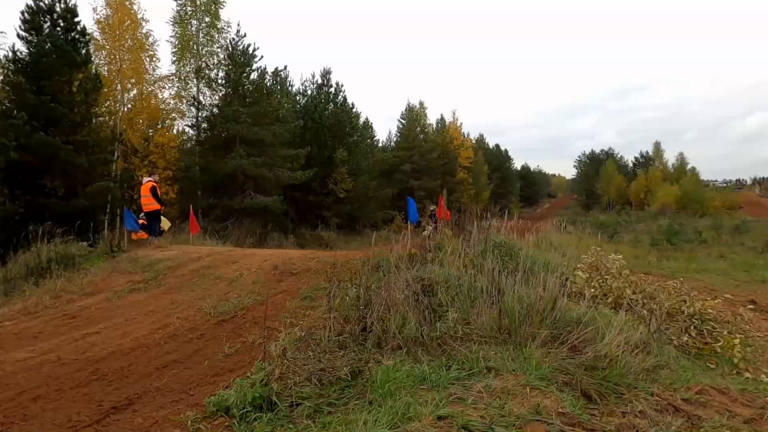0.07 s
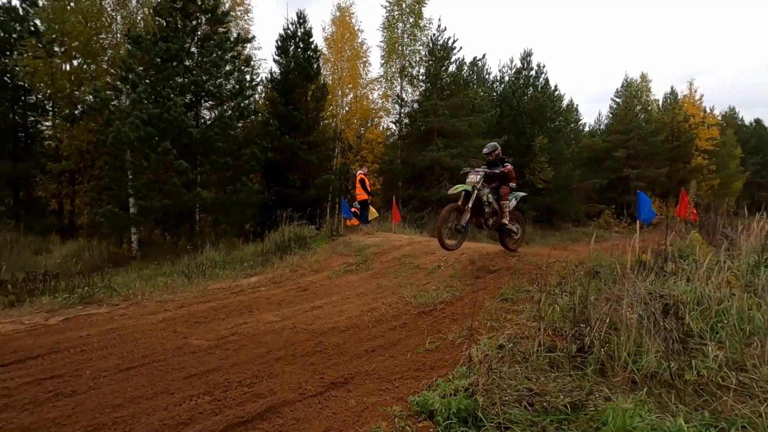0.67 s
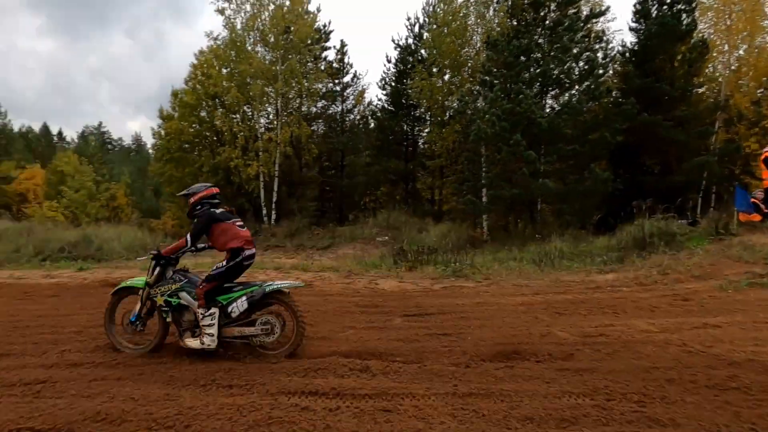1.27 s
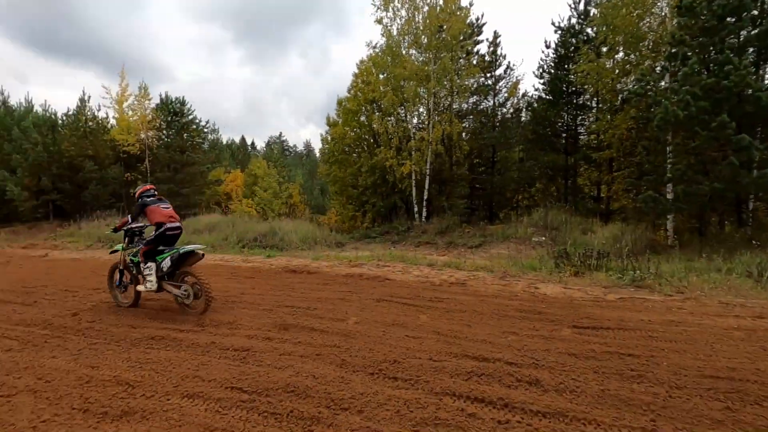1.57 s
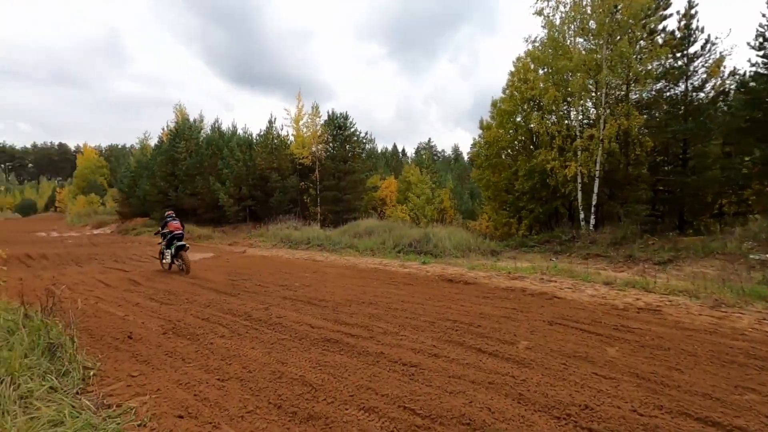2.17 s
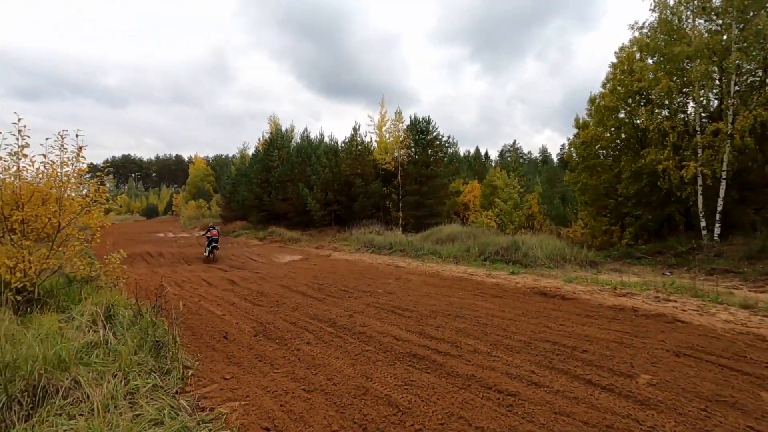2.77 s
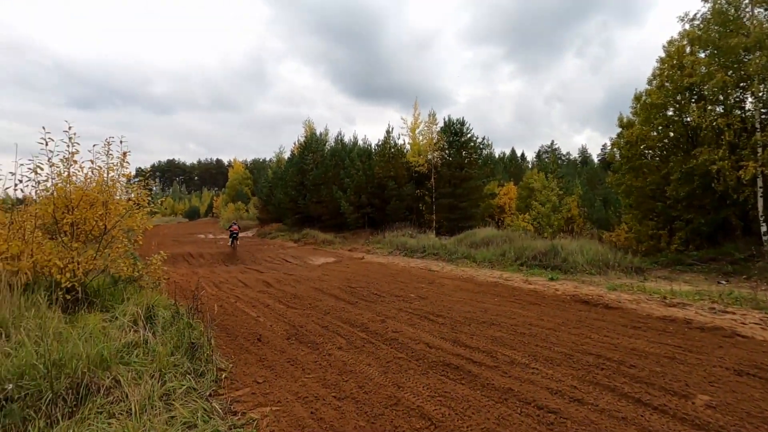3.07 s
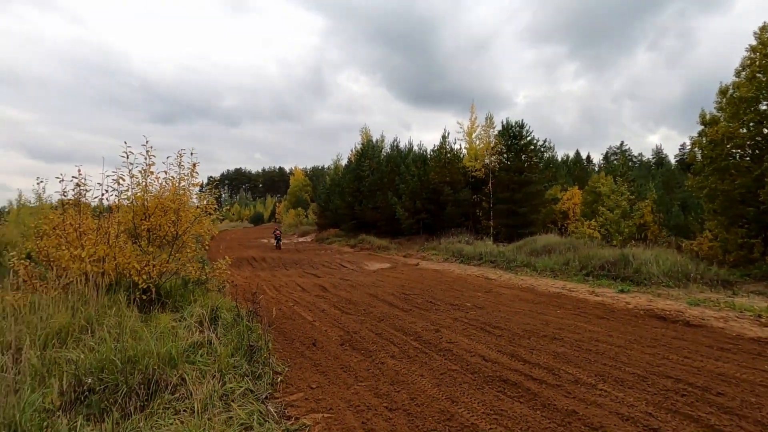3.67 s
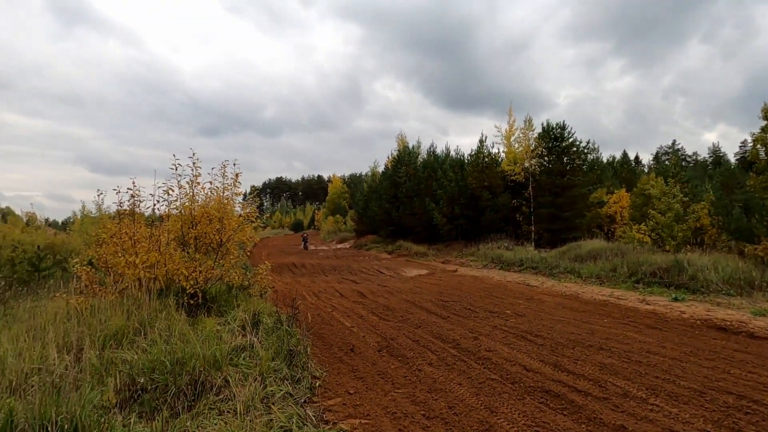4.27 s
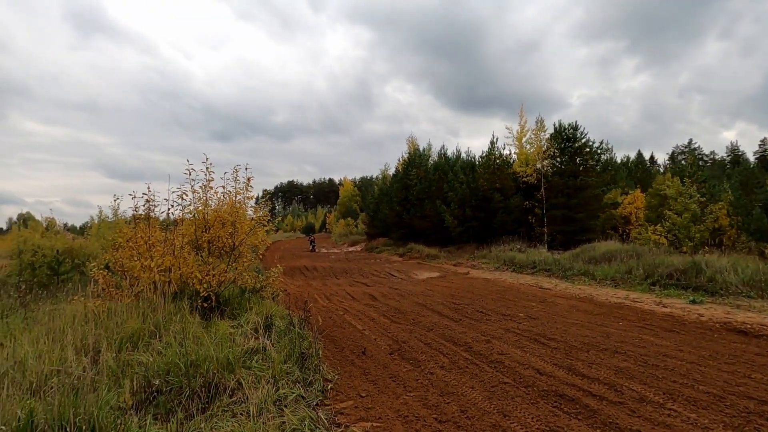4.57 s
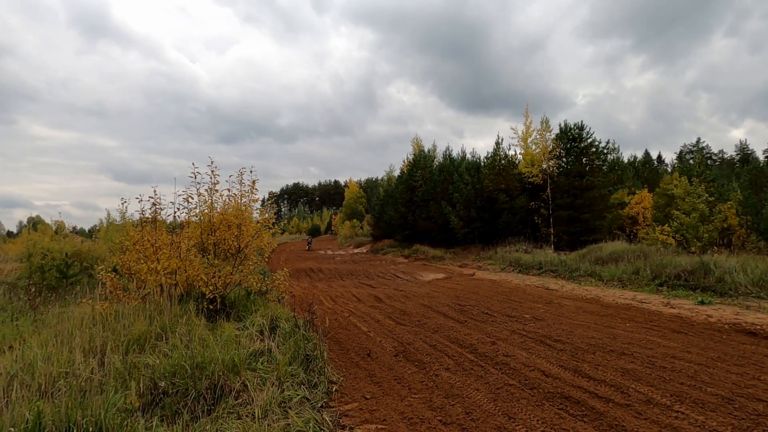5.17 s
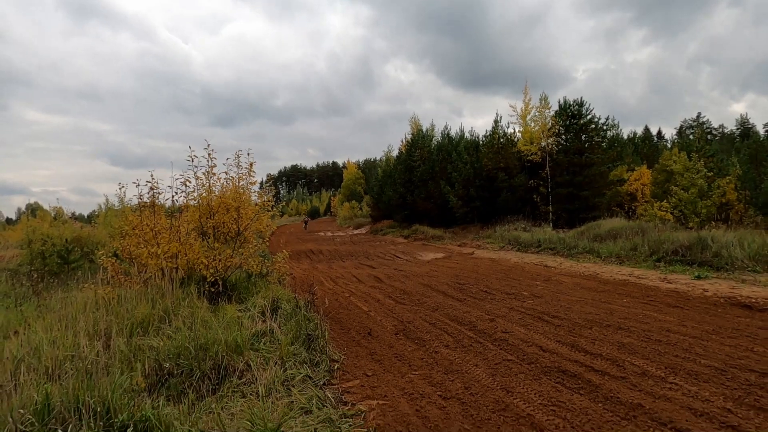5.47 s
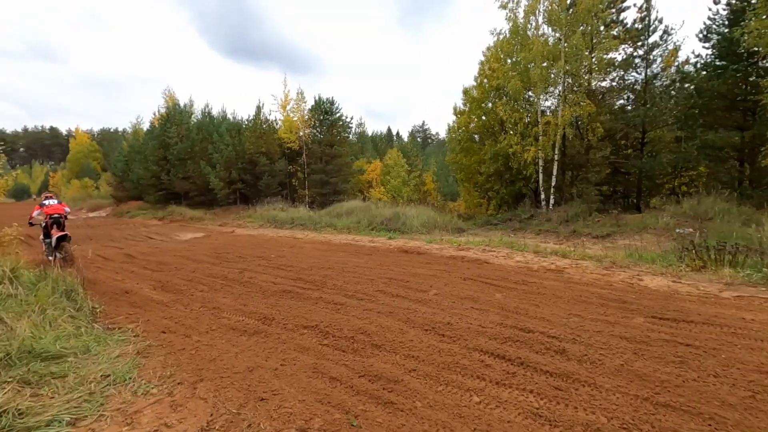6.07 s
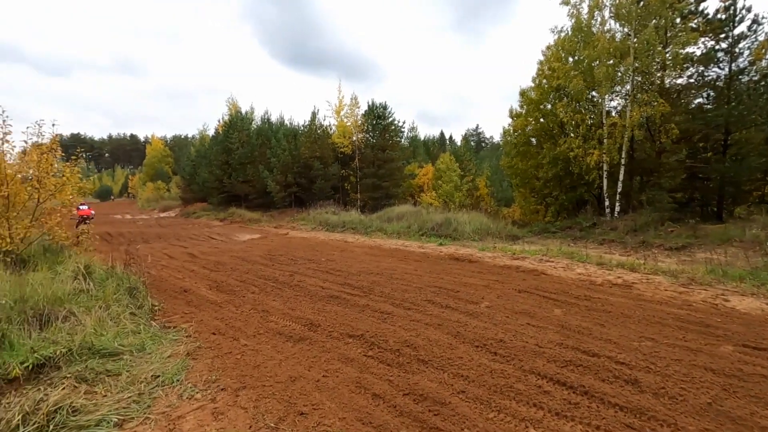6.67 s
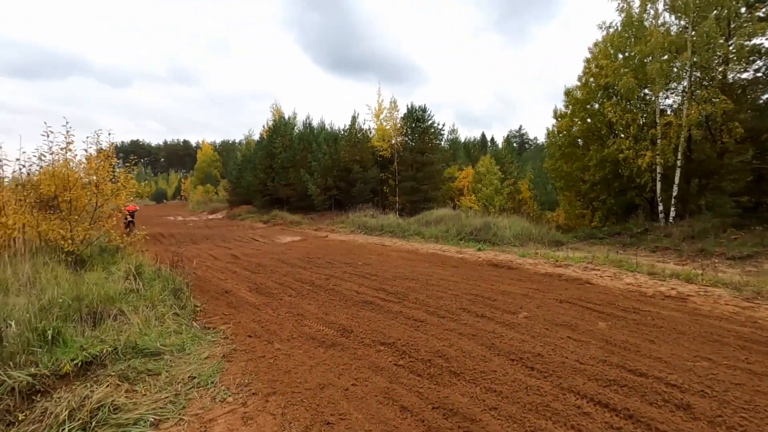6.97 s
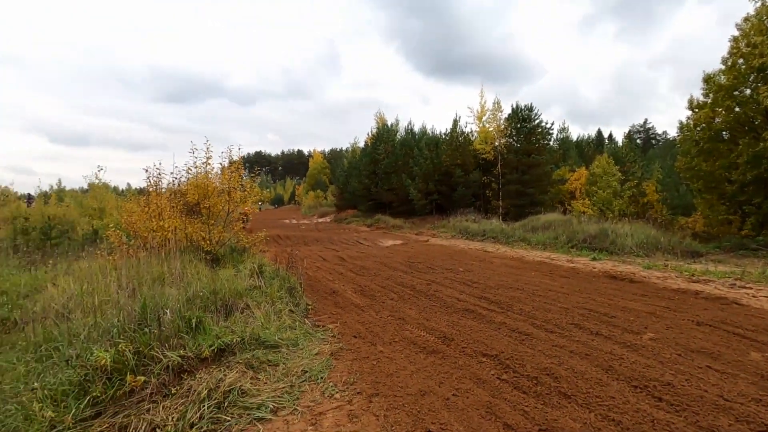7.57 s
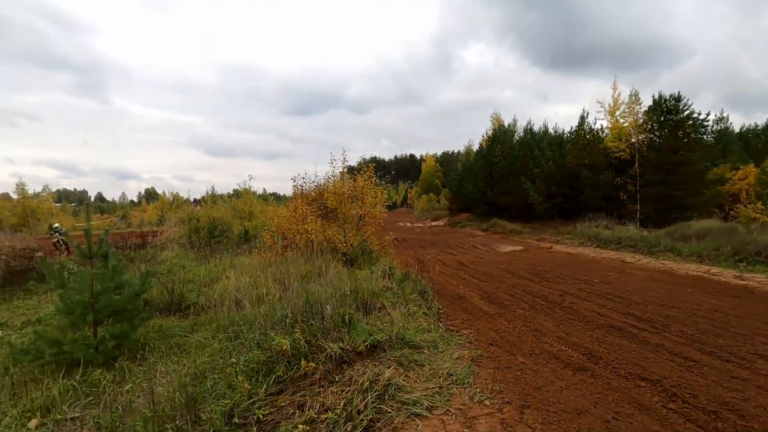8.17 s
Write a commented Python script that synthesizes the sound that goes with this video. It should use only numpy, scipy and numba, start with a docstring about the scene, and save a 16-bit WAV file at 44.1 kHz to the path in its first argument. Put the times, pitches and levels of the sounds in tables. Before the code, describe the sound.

A four-stroke motocross bike barks for an instant outdoors and cuts to silence at 0.1 seconds. At 0.4 the sound returns, the bike approaching and revving higher, its exhaust thumping and its engine clattering up close, with a second engine beating against it. It lands a jump with a sharp knock at 1.2 seconds; three exhaust pops and two tiny sprays of sand follow by 1.7. The bike rides off to the left in repeated rasping throttle bursts, most distant around 4.4 seconds. Another bike grows louder until the sound stops dead at 5.9. At 6.2 the engines fade quickly back in, barking and rasping further left and gradually receding, with a distant throttle snap near 7.8, until the end at about 8.3. Chains, tyres and soil hiss faintly under the engines, and low wind rumbles on the microphone, weaker in the last stretch.

```python
"""A four-stroke motocross bike barks across a dirt track; after a hard cut one comes close, jumps,
lands and rides off, and after another cut more follow. Each firing thumps the exhaust pipe and cracks
out a puff of gas; under load the tailpipe rasps, and close by the casing clatters. A second bike beats
against the nearest. Chains, tyres and thrown soil hiss, and a little wind rumbles on the microphone."""
import sys
import numpy as np
from scipy import signal
from scipy.fft import rfft, irfft
from scipy.io import wavfile
from scipy.ndimage import uniform_filter1d
from numba import njit

SR = 44100
rng = np.random.default_rng(int(sys.argv[2]) if len(sys.argv) > 2 else 0)


def persist_wave(psi):
    """Save psi, clipped to +-1, as 16-bit WAV."""
    counts = np.round(np.clip(psi, -1, 1) * 32767).astype(np.int16)
    wavfile.write(sys.argv[1], SR, np.atleast_2d(counts).T)


N = 366471
T = np.arange(N) / SR
TICKS = T[::100]  # slow clock of the controls
NEAR_M = 10  # distance from the microphone at which levels are set

# lead bike's throttle twists (opens [s], shuts [s], firing rate reached [Hz], honk swell if above 0 [dB])
LEAD_THROTTLE = [(-.14, 0.149, 72, 5), (0.159, 0.404, 64.5, 20.5), (0.402, 0.703, 63.6, 6.5),
                 (.705, .81, 68.5, 6), (0.799, 1.001, 86.83, 9.5), (1, 1.09, 87.64, 7),
                 (1.088, 1.205, 81.48, 11), (1.31, 1.389, 50.9, -2.5), (1.389, 1.582, 49.77, 1),
                 (1.6, 2.091, 63.32, 4.5), (2.159, 2.3, 64.63, 8), (2.335, 2.667, 68.38, 7.5),
                 (2.777, 3.045, 62.34, 4), (3.22, 3.527, 62, 4.5), (3.562, 3.797, 58.2, 3.5),
                 (3.876, 4.255, 63.04, 4), (4.426, 4.64, 66.28, 3), (4.691, 4.862, 63.93, 2.5),
                 (4.901, 5.386, 54.4, 0.5), (5.437, 5.624, 71.55, 0), (5.709, 5.911, 80.27, -2),
                 (6.121, 6.385, 38.46, 5.5), (6.392, 6.502, 64.44, 8), (6.532, 6.701, 78.22, 3.5),
                 (6.778, 6.857, 63, 10.5), (6.859, 7.254, 75.88, -2), (7.335, 7.439, 62.6, 3.5),
                 (7.438, 7.677, 84.36, -3.5), (7.796, 7.99, 68.07, 6.5), (8.01, 8.139, 69.7, 9.5),
                 (8.134, 8.312, 85.44, 4.5)]
# second bike's throttle twists (opens [s], shuts [s], firing rate reached [Hz], strength of firings [dB])
SECOND_THROTTLE = [(.135, 0.735, 60, -6.5), (.744, 1.333, 78, -6.5), (3.02, 3.5, 85.95, -4.5),
                   (3.541, 4.161, 87.97, -10.5), (4.335, 4.831, 44.99, -1.5), (4.9, 5.144, 66.12, 0),
                   (5.179, 5.796, 54.2, -9.5), (6.101, 6.451, 62.32, -11), (6.715, 7.003, 44.65, -2.5)]
# low resonance of the exhaust pipe (frequency [Hz], gain [dB])
PIPE_COLOUR = [(25, -51), (45, -6), (62, -8.5), (85, 5.5), (120, 9.5), (185, 6), (240, -7), (310, -11),
               (420, -49.5), (800, -116.5)]
# hiss of chains, tyres and soil (frequency [Hz], gain [dB])
HISS_COLOUR = [(1500, -6), (3000, -4.5), (4200, 5), (8200, -1.5), (9500, -15), (12000, -25.5),
               (14000, -45.5)]


def undb(db):
    """Decibels to gain."""
    return 10 ** (np.asarray(db) / 20)


def curves(rows):
    """One value a sample for each column after a table's time column."""
    s, *columns = np.transpose(rows)
    return [np.interp(T, s, column) for column in columns]


def unit(x):
    """Scale to rms 1."""
    return x / np.sqrt(np.mean(x ** 2))


def even(x, size=3300):
    """Hold the running rms at 1 and leave the single firings intact."""
    power = uniform_filter1d(uniform_filter1d(np.atleast_2d(x ** 2).mean(0), size), size)
    return x / np.sqrt(np.abs(power) + 1e-12)


def colour(x, points, size=8192):
    """Ring a minimum-phase body whose response follows (frequency [Hz], gain [dB]) points."""
    hz, db = np.transpose(points)
    gain_db = np.interp(np.log(np.arange(size // 2 + 1) * SR / size + 1), np.log(hz), db)
    cepstrum = irfft(np.log(undb(gain_db)))[:size // 2]
    cepstrum[0] /= 2
    response = irfft(np.exp(rfft(2 * cepstrum, size)))[:size // 2]
    return signal.oaconvolve(np.atleast_2d(x), response[None], axes=1)[:, :N]


@njit
def resonance(x, hz, width):
    """State-variable band-pass whose centre and width move, gain 1 at the centre."""
    y, band, low = np.empty(len(x)), 0., 0.
    for i in range(len(x)):
        g, damping = np.tan(np.pi * hz[i] / SR), width[i] / hz[i]
        v = (band + g * (x[i] - low)) / (1 + g * (g + damping))
        band, low, y[i] = 2 * v - band, low + 2 * g * v, damping * v
    return y


def two_chambers(x, hz, width):
    """Two equal resonances in a row: a narrower peak with steep skirts."""
    return resonance(resonance(x, hz, width), hz, width)


def air(apart, size=N):
    """Turbulence at the two sides of the microphone: a shared part and a part that differs."""
    noise = rng.standard_normal((3, size))
    return unit(noise[0] + apart * noise[1:])


def place(x, pan_db, lag_ms):
    """A source off to one side reaches left and right at different levels and times."""
    left = np.interp(T - lag_ms / 1000, T, x[0])
    return np.array([left * undb(pan_db / 2), x[1] * undb(-pan_db / 2)])


def throttle(twists, release_s, scale=float, attack_s=0.048):
    """Each twist attacks, holds its scaled level and releases; the strongest one counts."""
    envelopes = []
    for opens, shuts, _, db in twists:
        attack = np.clip((TICKS - opens) / attack_s, 0, 1)
        release = np.exp(-np.maximum(TICKS - shuts, 0) / release_s)
        envelopes.append(scale(db) * attack * release)
    return np.interp(T, TICKS, np.max(envelopes, axis=0))


def revs(twists, idle_hz=38.3, up_s=.205, down_s=.2):
    """Firing rate: it climbs while the throttle is open and sags towards idle once it shuts."""
    hz = np.full(len(TICKS), idle_hz)
    for opens, shuts, top_hz, _ in twists:
        coasting = top_hz < idle_hz + 2
        start_hz = idle_hz if coasting else np.interp(opens, TICKS, hz)
        held_s = np.clip(TICKS - opens, 0, shuts - opens)
        climb = np.expm1(-held_s / up_s) / np.expm1((opens - shuts) / up_s)
        driven_hz = start_hz + (top_hz - start_hz) * climb
        sag = np.exp(-np.maximum(TICKS - shuts, 0) / down_s)
        hz = np.where(TICKS < opens, hz, idle_hz + (driven_hz - idle_hz) * sag)
    return np.interp(T, TICKS, hz)


def firings(hz, jitter_s, scatter_db):
    """One pulse per engine cycle, each a little off in time and strength."""
    # first firing of each of the three stretches (time [s])
    first_firings = [0.0086, .39, 6.21]
    cycles = np.cumsum(hz) / SR
    marks = np.interp([*first_firings, T[-1]], T, cycles)
    firing_cycles = np.concatenate([np.arange(a, b) for a, b in zip(marks, marks[1:])])
    times = np.interp(firing_cycles, cycles, T)
    late, strong = rng.standard_normal((N // 300, 2))[:len(times)].T
    samples = np.clip((times + jitter_s * late) * SR, 0, N - 1).astype(int)
    return np.bincount(samples, undb(scatter_db * strong), N)


def doublings(metres):
    """How often the distance to the microphone has doubled beyond NEAR_M."""
    return np.log2(np.maximum(metres, 1) / NEAR_M)


def exhaust(pulses, metres, facing, swell_db):
    """Firings thump the pipe and, above it, ring the moving honk of intake and silencer."""
    # resonance of intake and silencer, moving with the heading (time [s], centre [Hz], width [Hz])
    honk_path = [(.1, 306, 115.7), (.45, 520, 327), (.75, 330, 202), (.87, 565, 88.7), (1.05, 516, 110),
                 (1.17, 437, 60), (1.35, 606, 466), (1.8, 357, 91.3), (2.6, 371, 64), (4.4, 354, 64.3),
                 (5.5, 338.2, 190), (6.5, 274.4, 74.6), (6.85, 270, 129.9), (7.1, 395, 171.4),
                 (7.38, 429.3, 193.1), (7.7, 310, 105.5), (8.07, 312.4, 65.17), (8.3, 383, 89.5)]
    # body of the silencer (frequency [Hz], gain [dB])
    silencer = [(150, -33.5), (250, 7.5), (340, 6), (600, 1.5), (750, -7), (1100, 2), (2600, -57.5)]
    hz, width = curves(honk_path)
    thump = -even(colour(pulses, PIPE_COLOUR))  # the pipe swings against the shock front
    ring = two_chambers(pulses, hz, 1.5 * width)  # each chamber is wider than the pair
    leak = -undb(-28) * pulses  # a little gets past the chambers, in step with their skirts
    honk = even(colour(ring + leak, silencer))
    thump_db = -17.5 - 2.13 * doublings(metres) + 4.5 * facing + 0.11 * swell_db
    honk_db = -30 - 2.16 * doublings(metres) + swell_db
    return np.repeat(undb(thump_db) * thump + undb(honk_db) * honk, 2, axis=0)


def puffs(pulses, rise_s, decay_s):
    """The gas flow that follows each pulse."""
    t = T[:SR // 20]
    puff = (1 - np.exp(-t / rise_s)) * np.exp(-t / decay_s)
    return unit(np.abs(signal.oaconvolve(pulses, puff)[:N]))


def flares():
    """Smooth swells and lulls of the bark, in dB."""
    # bell-shaped changes of level (time [s], half-length [s], height [dB])
    swells = [(0.065, 0.16, 5), (0.565, 0.17, 4.5), (1.003, 0.28, -0.5), (1.24, 0.041, -15.5),
              (1.355, 0.12, 4.5), (2.305, 0.37, -2.5), (3.5, 0.5, 4), (5.493, 0.36, -3), (6.659, 0.19, -2),
              (7.143, 0.18, -4.5), (7.404, 0.08, -2), (8.13, 0.11, -6)]
    s, half_s, db = np.transpose(swells)
    return np.interp(T, TICKS, np.exp(-((TICKS[:, None] - s) / half_s) ** 2) @ db)


def bark_and_hiss(pulses, metres, facing, swell_db, far_m=31):
    """Each firing's shock front and puff of gas ring the tailpipe; chain and soil hiss above it."""
    # tailpipe close to the microphone (frequency [Hz], gain [dB])
    near_colour = [(300, -5.5), (820, -1), (1050, 2), (1500, -1.5), (1900, -7), (3000, -10), (4200, -15.5),
                   (6000, -19.5), (10000, -62.5)]
    # tailpipe from far down the track (frequency [Hz], gain [dB])
    far_colour = [(350, -13.5), (820, -10), (970, -2.5), (1900, -0.5), (2450, -7), (3000, -9.5),
                  (4200, -13.5), (6000, -30), (10000, -58.5)]
    flare_db = flares()
    sharp_db = -12.5 + 21.5 * facing + 0.51 * flare_db  # on the pipe's axis, cracks top the smeared roar
    far = np.clip(metres / far_m * (0.18 + facing), 0, 1)
    flow = puffs(pulses, rise_s=0.00081, decay_s=0.0016)
    crack = flow * air(apart=0.55) + undb(sharp_db - 9.5) * unit(pulses)
    gas = undb(sharp_db) * even(crack) + air(apart=0.65)
    bark = (1 - far) * even(colour(gas, near_colour)) + far * even(colour(gas, far_colour))
    jet = even(flow) * air(apart=0.94)
    hiss = colour(undb(sharp_db - 6.5) * jet + air(apart=1.0), HISS_COLOUR)
    bark_db = -31 - 6.5 * doublings(metres) + 6.5 * facing + 0.44 * swell_db + flare_db
    hiss_db = -39 - 8.5 * doublings(metres)
    return undb(bark_db) * even(bark), undb(hiss_db) * even(hiss)


def rasp(pulses, starts, ends, from_hz, to_hz, width_hz, db, rise_s=.025, fall_s=0.0073, puff_s=0.0022):
    """Shock fronts and a little turbulence ring the tailpipe at a gliding resonance and its octave."""
    span = (T > starts - rise_s) & (T < ends + 5 * fall_s)
    t, fronts = T[span], pulses[span]
    puff = signal.lfilter([1], [1, -np.exp(-1 / (SR * puff_s))], fronts)
    drive = unit(fronts) + undb(-15) * unit(puff * rng.standard_normal(len(t)))
    hz = np.interp(t, [starts, ends], [from_hz, to_hz])
    width = np.full(len(t), float(width_hz))
    first, octave = (two_chambers(drive, k * hz, k * width) for k in (1, 2))
    envelope = np.clip((t - starts) / rise_s + .5, 0, 1) * np.exp(-np.maximum(t - ends, 0) / fall_s)
    out = np.zeros(N)
    out[span] = unit(first + undb(-19) * octave) * envelope
    return undb(db) * out


def load_rasps(pulses):
    """Under load the lead bike's firings make its tailpipe rasp."""
    # spells of load (start [s], end [s], resonance from [Hz], to [Hz], chamber width [Hz], level [dB])
    spells = [(0.005, .13, 1250, 1460, 900, -27.5), (1.799, 2.685, 1047, 1190, 418, -37.5),
              (3.186, 3.4, 3033, 2833, 800, -43.5), (3.401, 3.75, 1300, 1090, 750, -43),
              (3.949, 4.703, 1241, 1053, 750, -42), (5.421, 5.801, 1722, 1708, 550, -38.5),
              (6.492, 7.085, 3040, 3516, 900, -41), (6.875, 7.086, 1830, 1640, 330, -35.5),
              (7.088, 7.271, 1640, 1953, 750, -34.5), (7.294, 7.47, 1960, 1957, 750, -34.5),
              (7.493, 7.74, 1880, 1680, 600, -39), (8.007, 8.33, 1786, 1687, 700, -35)]
    return sum(rasp(pulses, *spell) for spell in spells)


def clatter(hz, metres, facing, decay_cycles=0.93, ring_width_hz=380.):
    """Valves and gears rattle alike in every cycle, so the casing's overtones follow the engine speed."""
    # engine casing close to the microphone (frequency [Hz], gain [dB])
    casing = [(200, -24.5), (330, 4), (620, 7.5), (1150, 0.5), (1700, -5.5), (2700, -8), (3800, -11.5),
              (7000, -35.5)]
    # the casing's two resonances (time [s], lower [Hz], upper [Hz])
    casing_rings = [(.7, 2230, 3280), (.83, 2350, 2820), (1.15, 2000, 2690), (5.6, 1748, 3160)]
    turn = np.linspace(0, 1, 512)
    cycle = air(apart=0.45, size=len(turn)) * np.exp(-turn / decay_cycles)
    phase = np.cumsum(hz) / SR % 1
    rattle = colour(np.array([np.interp(phase, turn, side) for side in cycle]), casing)
    width = np.full(N, ring_width_hz)
    rings = sum(np.array([resonance(side, ring_hz, width) for side in rattle])
                for ring_hz in curves(casing_rings))
    db = -26.5 - 6 * doublings(metres) - 17 * facing  # faint from behind the bike
    return undb(db) * even(rattle + undb(3) * rings)


def wind():
    """Wind rumbles on the microphone in slow gusts."""
    # strength of the gusts (time [s], level [dB])
    gusts = [(.8, -23.5), (1.7, -22.5), (5.2, -21.5), (6.2, -31)]
    # rumble at the microphone (frequency [Hz], gain [dB])
    rumble = [(20, -25.5), (48, 11), (80, 14.5), (1500, -84.5)]
    gust_db, = curves(gusts)
    return undb(gust_db) * unit(colour(air(apart=0.051), rumble))


def bangs():
    """The landing knocks and the exhaust pops: each a short crack with a thump of the pipe."""
    # landing and pops (time [s], crack peak [dB], pitch [Hz], t60 [s], thump against crack [dB])
    hits = [(1.2115, -6.5, 1400, .035, -6), (1.377, -13, 2400, .04, -4), (1.494, -17, 1000, .02, 5),
            (1.569, -10, 1500, .02, 1)]
    out = np.zeros((2, N))
    t = T[:SR // 8]
    thump = colour(1. * (T == 0), PIPE_COLOUR)[0, :len(t)]
    thump /= np.abs(thump).max()
    for s, db, hz, t60_s, thump_db in hits:
        band = signal.butter(3, [hz * 0.48, hz * 1.59], "band", fs=SR, output="sos")
        crack = signal.sosfilt(band, rng.standard_normal(len(t)) * undb(-60 * t / t60_s))
        crack /= np.abs(crack).max()
        start = int(s * SR)
        out[:, start:start + len(t)] += undb(db) * (crack + undb(thump_db) * thump)
    return out


def soil():
    """The rear tyre throws short sprays of sand."""
    # sprays after the landing (time [s], level [dB], half-length [s])
    sprays = [(1.439, -31.5, 0.015), (1.691, -31, 0.0054)]
    flow = sum(undb(db) * np.exp(-((T - s) / half_s) ** 2) for s, db, half_s in sprays)
    return flow * unit(colour(air(apart=0.33), HISS_COLOUR))


def misfires():
    """A gain that dips briefly where a firing is missed."""
    # missed firings (time [s], depth [dB], half-length [s])
    misses = [(1.607, -7.5, 0.019), (2.087, -13, 0.0056)]
    return undb(sum(db * np.exp(-((T - s) / half_s) ** 2) for s, db, half_s in misses))


def blips(scatter_db=1.5):
    """The second bike snaps its throttle: a short run of quickening, rasping firings, with firings of their
    own."""
    # throttle snaps (start [s], end [s], firing rate from [Hz], to [Hz],
    # resonance from [Hz], to [Hz], chamber width [Hz], level [dB])
    snaps = [(3.069, 3.178, 54, 66.6, 1800, 1596, 400, -35),
             (7.775, 8.003, 51.4, 65.33, 1332, 1450, 1249, -31)]
    out = np.zeros(N)
    for starts, ends, from_rate, to_rate, *tone in snaps:
        hz = np.interp(T, [starts, ends], [from_rate, to_rate]) * (T >= starts)
        cycles = np.cumsum(hz) / SR
        pulses = np.diff(np.ceil(cycles), prepend=0) * undb(scatter_db * rng.standard_normal(N))
        out += rasp(pulses, starts, ends, *tone)
    return out


def scene():
    """Two engines share one exhaust sound; distance and heading set level and colour at the trackside."""
    # microphone to the nearest bike, as riders come and go (time [s], distance [m])
    distance = [(.1, 26), (.45, 17), (.8, 10.2), (1.19, 7.7), (1.4, 12), (1.65, 15.2), (1.95, 12.8),
                (2.6, 19.2), (3.5, 28.4), (4.4, 40.7), (5.2, 20.2), (5.8, 9.2), (6.25, 20.5), (6.5, 15.3),
                (7.4, 22.2), (8.2, 26.9)]
    # how squarely its tailpipe points at the microphone (time [s], facing [0-1])
    heading = [(.1, 0.24), (.5, 0), (1, 0), (1.4, 0), (1.85, 0.51), (2.6, 0.61), (3, 0.3), (3.5, 0.34),
               (4.4, 0.38), (5.15, 0.07), (5.55, 0.46), (5.9, 0.41), (6.7, 0.66), (7.1, 0.83), (8.3, 0.95)]
    # its direction from the microphone (time [s], left minus right [dB], lag of the left side [ms])
    bearing = [(1.2, -2.5, -0.0075), (3, 5, 0.071), (4, 3.5, 0.059), (6.7, 7.5, -0.017), (7.2, 14.5, 0.092)]
    metres, = curves(distance)
    facing, = curves(heading)
    pan_db, lag_ms = curves(bearing)
    swell_db = throttle(LEAD_THROTTLE, release_s=0.032)
    second_gain = throttle(SECOND_THROTTLE, release_s=0.7, scale=undb)
    lead_hz = revs(LEAD_THROTTLE)
    lead = firings(lead_hz, jitter_s=.00004, scatter_db=.9)
    second = second_gain * firings(revs(SECOND_THROTTLE), jitter_s=.00013, scatter_db=1.4)
    boom = resonance(second, np.full(N, 220.), np.full(N, 90.))  # the second bike's pipe booms higher
    pipes = exhaust(lead + second + undb(2.5) * boom, metres, facing, swell_db)
    bark, hiss = bark_and_hiss(lead + undb(-3.5) * second, metres, facing, swell_db)
    bikes = place(pipes, 1.0, lag_ms) + place(bark, pan_db, lag_ms) + place(hiss, pan_db - 2.5, lag_ms)
    bikes += place([load_rasps(lead)] * 2, pan_db - 2, lag_ms)
    bikes += place(clatter(lead_hz, metres, facing), pan_db, lag_ms)
    second_snaps = place([blips()] * 2, -0.5, lag_ms)
    return misfires() * bikes + second_snaps + bangs() + soil() + wind()


def record(dry):
    """Peaks are rounded; twice the sound stops dead and fades in after a silence; the top is cut."""
    ceiling, top_hz = .72, 13000
    rounded = dry / (1 + (dry / ceiling) ** 6) ** (1 / 6)
    # fader between the three stretches (time [s], level [dB])
    fader = [(.124, 0), (.126, -50), (.15, -62), (.375, -62), (.39, -32), (.415, -15), (.45, 0),
             (5.918, 0), (5.921, -50), (5.97, -70), (6.15, -70), (6.18, -24), (6.21, -5), (6.235, 0)]
    fade_db, = curves(fader)
    fade = np.where(fade_db > -55, undb(fade_db), 0)
    low_pass = signal.ellip(8, .2, 80, top_hz, fs=SR, output="sos")
    return signal.sosfilt(low_pass, rounded * fade)


dry = scene()
out = record(dry)
persist_wave(out)
```